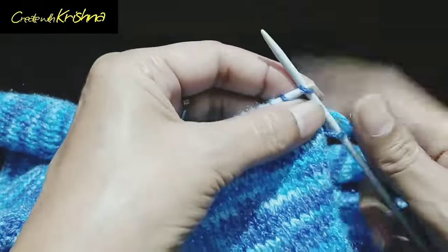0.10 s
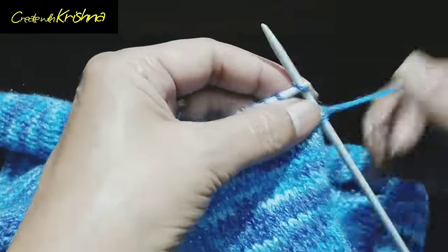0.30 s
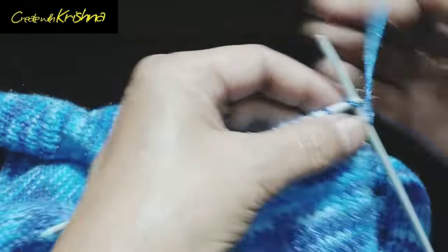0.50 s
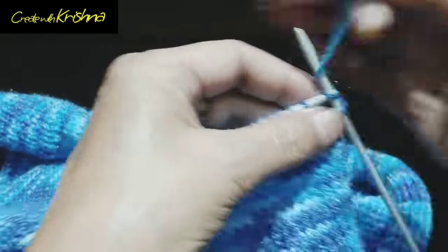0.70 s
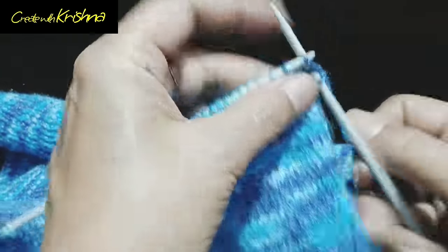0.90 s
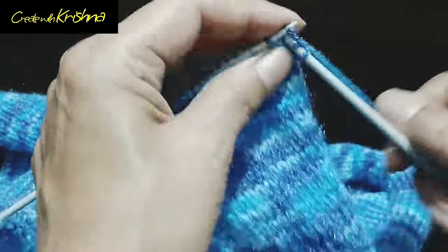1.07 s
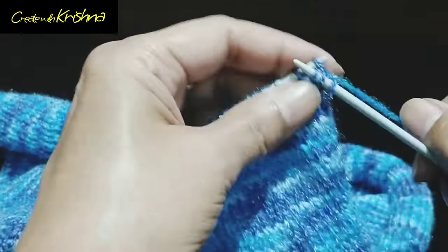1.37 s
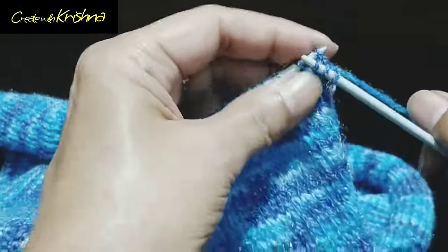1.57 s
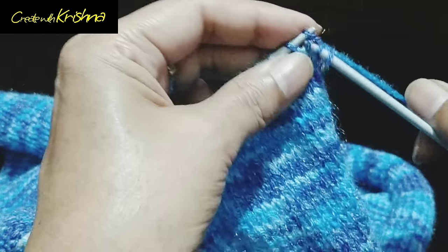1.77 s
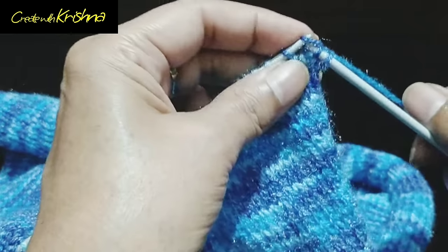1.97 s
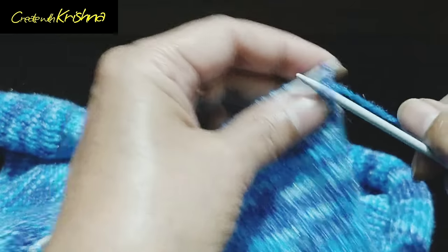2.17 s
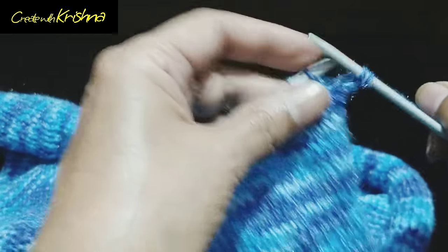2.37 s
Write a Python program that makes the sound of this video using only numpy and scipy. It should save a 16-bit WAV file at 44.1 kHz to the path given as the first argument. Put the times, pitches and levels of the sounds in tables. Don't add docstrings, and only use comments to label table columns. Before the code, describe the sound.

A metal knitting needle knocks sharply on a table, then faint clicks and yarn rustle over a hum

```python
import sys
import numpy as np
from scipy import signal
from scipy.fft import rfft, irfft, next_fast_len
from scipy.io import wavfile
from scipy.ndimage import map_coordinates

SR = 44100
rng = np.random.default_rng(int(sys.argv[2]) if len(sys.argv) > 2 else 0)


def digitize_waveform(pressure):
    field = np.atleast_2d(pressure).T
    bounded = np.clip(field, -1, 1)
    quanta = np.round(bounded * 32767).astype(np.int16)
    wavfile.write(sys.argv[1], SR, quanta)


def natural_amplitude(level_db):
    exponent = np.asarray(level_db, float) / 20
    return 10 ** exponent


N = 110250
TOP_HZ = 15550


def unit(x):
    return x / np.sqrt(np.mean(x ** 2) + 1e-20)


def along(points, hz):
    f, v = np.transpose(points)
    return np.interp(np.log(hz + 1), np.log(f + 1), v)


def wobble(rate):
    knots = rng.standard_normal(2000)
    return map_coordinates(knots, [np.arange(N) * min(rate, 700) / SR])


def filtered(x, response):
    m = next_fast_len(N + SR // 2)
    return irfft(rfft(x, m) * response(np.fft.rfftfreq(m, 1 / SR)), m)[..., :N]


def coloured(x, spectrum):
    return unit(filtered(x, lambda hz: natural_amplitude(along(spectrum, hz))))


def streaked(x):
    peaks = rng.standard_normal(400)
    return filtered(x, lambda hz: natural_amplitude(10 * map_coordinates(peaks, [hz / 60])))


STRUCK_HZ = [480, 810, 1620, 1950, 2850, 3634, 5475, 5879, 7200, 10330, 11050, 11890, 13540, 15200]
# left level/dB, right level/dB, hold/s, t60/s
STRUCK_RINGS = [(-37.5, -57, .008, .05), (-40.5, -45, 0.004, 0.023), (-25.5, -30.5, 0.0015, 0.023),
                (-32.5, -36.5, 0.0026, .025), (-28.5, -30.5, .003, 0.029), (-31, -45, .001, 0.038),
                (-38.5, -35.5, .012, 0.17), (-35.5, -33.5, .012, 0.18), (-29, -30.5, .001, 0.02),
                (-29.5, -37.5, .01, .06), (-14.5, -34, .001, .03), (-18.5, -45.5, 0.0054, .055),
                (-4.5, -35, .009, .035), (-38, -49.5, 0.014, .12)]
# f/Hz, left level/dB, right level/dB, hold/s, t60/s
STAND_RINGS = [(31, -41.5, -53, 0.026, 0.45), (56, -37, -45.5, 0.015, .15)]
# f/Hz, level/dB per Hz
CRACK_SPECTRUM = [(150, -6.5), (400, -13.5), (1600, 3.5), (4000, -0.5), (7000, 4.5), (9000, -1.5),
                  (12000, 2), (16000, -14.5)]
# f/Hz, level/dB per Hz
CLATTER_SPECTRUM = [(88, -29), (150, 5.5), (774, -24), (2650, -18.5), (4950, -18.5), (5680, -9),
                    (7400, -24), (13400, -13.5), (16000, -21.5)]


def knock():
    knock_s, rise_s, soft_s = .2258, 0.00048, 0.0024
    crack_t60, clatter_t60 = 0.025, 0.25
    right_lag_s = .000085
    t = np.maximum(np.arange(N) / SR - knock_s, 0)
    crack_db = -15.5 + np.array([[0], [-6]])
    crack = coloured(rng.standard_normal((2, N)), CRACK_SPECTRUM)
    out = natural_amplitude(crack_db - 60 * t / crack_t60) * crack
    clatter = coloured(streaked(rng.standard_normal((2, N))), CLATTER_SPECTRUM)
    out += natural_amplitude(-37 - 60 * t / clatter_t60) * clatter
    rings = [(hz, *row) for hz, row in zip(STRUCK_HZ, STRUCK_RINGS)]
    for hz, left_db, right_db, held, t60 in rings + STAND_RINGS:
        past = soft_s * np.logaddexp(0, (t - held) / soft_s)
        high = min(1, hz / 3000)
        flutter = np.array([wobble(110) + 1j * wobble(110) for port in "LR"])
        body = 1 + .28 * high * np.minimum(t / 0.018, 2) * flutter
        lag = 2j * np.pi * hz * right_lag_s * np.array([[0], [1]])
        body = body * np.exp(1j * high * rng.normal(0, 1) - lag)
        level = natural_amplitude([[left_db], [right_db]] - 60 * past / t60)
        out += level * (body * np.exp(2j * np.pi * hz * t)).imag
    return out * (1 - np.exp(-t / rise_s))


# t/s, f/Hz, left level/dB, right level/dB, t60/s
SLAPS = [(.2262, 8050, -20, -35, .012), (.2272, 6800, -30.5, -20.5, 0.011),
         (.2284, 5640, -21.5, -12.5, .016), (.2268, 1500, -28.5, -29, .02), (.2288, 15350, -22, -42.5, .02),
         (.228, 5787, -47.5, -44.5, .13), (.228, 6145, -50, -46.5, .1), (.228, 4570, -44, -44, 0.048),
         (.2265, 880, -35.5, -38.5, 0.033), (.2285, 15080, -23.5, -46, .06),
         (0.23, 16000, -28, -47.5, .012)]


def slaps():
    rise_s = 0.0008
    out = np.zeros((2, N))
    for s, hz, left_db, right_db, t60 in SLAPS:
        t = np.maximum(np.arange(N) / SR - s, 0)
        level = natural_amplitude([[left_db], [right_db]] - 60 * t / t60)
        out += level * (1 - np.exp(-(t / rise_s) ** 2)) * np.sin(2 * np.pi * hz * t)
    return out


def needle(x, hiss_db, modes):
    def response(f):
        ring = 0
        for k, (centre, width, db) in enumerate(modes):
            damping = 1j * f * width * 1.2
            ring = ring + (-1) ** k * natural_amplitude(db) * damping / (centre * centre - f * f + damping)
        dip = 1 - 0.8 * np.exp(-((f - 9000) / 1100) ** 2)
        no_bass = (1j * f / (900 + 1j * f)) ** 2
        return (ring + natural_amplitude(hiss_db - 7.5)) * dip * no_bass
    return filtered(x, response)


# f/Hz, width/Hz, level/dB, loudest t/s
DRAG_RINGS = [(1360, 70, -6, 0.744), (1640, 60, -4.5, 0.818), (2494, 45, -0.5, .87), (2879, 110, -1, 0.684),
              (3380, 95, -11.5, 0.81), (4360, 100, -17.5, .7), (5450, 50, -3, 0.836), (6130, 80, -7, 0.81),
              (6340, 50, -9, 0.79), (7180, 100, -9.5, .65), (7620, 60, -4.5, 0.84), (11900, 59, -0.5, 0.85),
              (13500, 55, -0.5, .84), (15200, 70, -2, .83)]
# t/s, level/dB
DRAG_PRESSURE = [(0.6, -72), (0.674, -63.5), (0.784, -64.5), (0.848, -59.5), (0.879, -63), (0.896, -78),
                 (0.93, -76)]
# t/s, peak level/dB, rattle t60/s
BOUNCES = [
    (0.5202, -40, 0.11),
    (0.5344, -38, 0.16),
]
# f/Hz, width/Hz, level/dB
LOOSE_RINGS = [(1270, 115, -2.5), (2980, 310, 1), (4540, 200, -15), (6170, 215, 0.5), (7550, 200, 0.5),
               (10600, 500, -6.5), (11800, 180, -4.5), (13500, 300, -1.5), (15000, 360, -10.5)]


def drag():
    favour_db, favour_s = 5.5, 0.034
    tap_t60, rattle_db, tap_snap = .012, -9, 3
    press_s, press_db = np.transpose(DRAG_PRESSURE)
    t = np.arange(N) / SR
    grit = natural_amplitude(wobble(120)) * rng.standard_normal(N)
    scrape = needle(grit, -10.5, [])
    for *mode, loudest in DRAG_RINGS:
        favour = natural_amplitude(favour_db * np.exp(-((t - loudest) / favour_s) ** 2))
        scrape += needle(favour * grit, -60, [mode])
    out = natural_amplitude(2.5 + np.interp(t, press_s, press_db, left=-120, right=-120)) * unit(scrape)
    for s, db, t60 in BOUNCES:
        fall_db = -60 * np.abs(t - s)
        shake = (t > s) * (natural_amplitude(fall_db / tap_t60) + natural_amplitude(rattle_db + fall_db / t60))
        shake *= rng.standard_normal(N)
        shake[round(s * SR)] += tap_snap
        tap = needle(shake, -4.5, LOOSE_RINGS)
        out += natural_amplitude(db) * tap / np.abs(tap).max()
    return out


# t/s, peak level/dB, t60/s, dullness/dB per octave, ring f/Hz
CLICKS = [
    (1.8853, -32.5, 0.012, 3, 5850),
    (2.2785, -26, 0.0085, -4, 10300),
    (2.333, -43, .012, -4, 15000),
    (2.4625, -46.5, 0.013, 10, 4800),
    (2.463, -50, .013, 26, 2600),
    (1.152, -58.5, 0.014, 3, 13500),
]
# f/Hz, level/dB per Hz
TIP_SPECTRUM = [(1180, -66), (2000, -32), (4000, -29), (6500, -19), (8930, -26), (10600, -15), (13800, 1),
                (15600, -4), (16600, -23.5)]


def clicks():
    rise_s, snap = .0003, 7
    ring_db, ring_width = 9, .09
    out = np.zeros(N)
    for s, db, t60, dull_db, ring_hz in CLICKS:
        top_hz = 16700 if db > -43 else TOP_HZ
        t = np.arange(N) / SR - s
        swell = np.where(t > 0, natural_amplitude(-60 * np.abs(t) / t60), np.exp(-np.abs(t) / rise_s))
        burst = swell * rng.standard_normal(N)
        burst[round(s * SR)] += snap
        burst = filtered(burst, lambda hz: natural_amplitude(ring_db * np.exp(-((hz / ring_hz - 1) / ring_width) ** 2)))
        tilted = [(hz, level - dull_db * np.log2(max(hz, 4500) / 6000)) for hz, level in TIP_SPECTRUM]
        burst = coloured(burst, tilted)
        burst = filtered(burst, lambda hz: 1 / (1 + (hz / top_hz) ** 100))
        out += natural_amplitude(db) * burst / np.abs(burst).max()
    return out


# middle t/s, length/s, level/dB, dull rub level/dB, brightest f/Hz
RUSTLES = [(0.414, 0.16, -70, -11, 13500), (0.562, 0.06, -68, -11, 13800), (.855, 0.055, -62.5, -20, 13500),
           (0.616, 0.031, -67.5, -17, 13500), (0.933, 0.11, -68, -14, 13500),
           (1.047, 0.076, -63.5, -15, 13200), (1.294, 0.043, -54.5, -22.5, 12550),
           (1.253, .03, -66.5, -16, 13000), (1.359, 0.087, -77, -2.5, 13100),
           (1.767, 0.047, -69, -16.5, 13500), (2, 0.021, -77, -17, 13500), (2.193, .1, -76, -11, 13500),
           (2.292, 0.031, -60, -20, 14200), (2.325, 0.031, -59.5, -23, 14000),
           (2.355, 0.073, -84, 6, 13000), (2.468, 0.045, -76, -9, 14500)]
# f/Hz, level/dB per Hz
YARN_SPECTRUM = [(4120, -38), (7000, -21), (9100, -29), (11050, -7.5), (11700, -15), (12800, -3),
                 (14000, -6.5), (15100, -5.5), (16000, -9.5)]
# f/Hz, level/dB per Hz
RUB_SPECTRUM = [(1200, -14), (2500, 2), (4500, 1.5), (6000, 7), (8500, -38)]


def yarn():
    bright_db, bright_width_hz = 3, 670
    t = np.arange(N) / SR
    fine = coloured(natural_amplitude(2 * wobble(160)) * rng.standard_normal(N), YARN_SPECTRUM)
    rub = coloured(natural_amplitude(2 * wobble(160)) * rng.standard_normal(N), RUB_SPECTRUM)
    out = np.zeros(N)
    for s, length, db, rub_db, hz in RUSTLES:
        bright = unit(filtered(fine, lambda f: natural_amplitude(bright_db * np.exp(-((f - hz) / bright_width_hz) ** 2))))
        swell = np.exp(-np.abs(2 * (t - s) / length) ** 3)
        out += natural_amplitude(db) * swell * (bright + natural_amplitude(rub_db) * rub)
    return 1.77 * out


# f/Hz, left over right level/dB
PORT_SHADE = [(1000, -2), (5000, 5), (9000, 15), (13000, 28), (16000, 14.5)]


def ports(x):
    return filtered(x, lambda hz: natural_amplitude(along(PORT_SHADE, hz) * np.array([[0], [-1]])))


# f/Hz, t60/s
ROOM_T60 = [(200, 0.23), (2000, 0.27), (6000, 0.43), (15000, 0.15)]


def room(x):
    hz, t, z = signal.stft(rng.standard_normal((2, SR // 2)), SR, nperseg=256)
    fade = natural_amplitude(-60 * t / along(ROOM_T60, hz)[:, None])
    tail = signal.istft(z * fade, SR, nperseg=256)[1]
    late = np.pad(x, (200, 0))[None]
    return signal.fftconvolve(late, tail / np.linalg.norm(tail[0]), axes=1)[:, :N]


# f/Hz, likeness (-1 to 1)
ALIKE = [(60, 0.73), (180, 0.83), (550, 0.78), (1650, -0.24), (4970, 0.0), (15000, -0.29)]


def rush(spectrum, low_hz, top_hz):
    def gain(hz):
        turn = np.arccos(np.clip(along(ALIKE, hz), -1, 1)) / 2
        band = (hz > low_hz) * (hz < top_hz)
        return natural_amplitude(along(spectrum, hz)) * band * [np.cos(turn), np.sin(turn)]
    mid, side = filtered(rng.standard_normal((2, N)), gain)
    return unit(np.array([mid + side, mid - side]))


# f/Hz, rms level/dB, unsteadiness/dB, swings per s
HUM = [(52.4, -74.5, 5, 3.9), (145.3, -63.5, 2.5, 3.7), (241, -68, 3, 12), (267.9, -70, 2, 16),
       (359.7, -81, 4, 14), (483, -75, 3.5, 14), (601.8, -70, 1, 12), (716.7, -77.5, 2.5, 14)]
# t/s, rms level/dB
BEAT = [(0.0, -78), (0.12, -58), (0.63, -63.5), (0.76, -77), (0.83, -62.5), (1.02, -80), (1.06, -62),
        (1.25, -60.5), (1.37, -71), (1.51, -58), (1.72, -72), (2.0, -61.5), (2.46, -65), (2.5, -68.5)]
# f/Hz, level/dB per Hz
AIR_SPECTRUM = [(12, -35.5), (20, 1.5), (143, -11), (191, -6.5), (255, -5.5), (341, -8), (597, -9),
                (665, -18.5), (1500, -25), (1950, -61), (3300, -120)]
# f/Hz, level/dB per Hz
HISS_SPECTRUM = [(530, -31), (900, 0.5), (1620, -9), (2250, -8.5), (2960, -10.5), (3190, -10), (9880, -19),
                 (14500, -8.5), (16000, -19.5)]


def fan():
    beat_hz, edge_hz = 99.5, 1100
    t, out = np.arange(N) / SR, np.zeros((2, N))
    for hz, db, swing_db, rate in HUM:
        phase = 2 * np.pi * hz * t + 0.37 * swing_db * wobble(rate)
        apart = .45 * hz / 200 * (1 + np.array([wobble(rate), -wobble(rate)]))
        level = natural_amplitude(db + swing_db * wobble(rate) + [[.8], [-.8]])
        out += np.sqrt(2) * level * np.sin(phase + apart)
    beat_phase = 2 * np.pi * beat_hz * t + .5 * wobble(5) + [[.2], [-.2]]
    out += 1.4 * natural_amplitude(np.interp(t, *np.transpose(BEAT))) * np.sin(beat_phase)
    out += natural_amplitude(-62 + 0.33 * wobble(6)) * rush(AIR_SPECTRUM, 15, edge_hz)
    return out + natural_amplitude(-70) * rush(HISS_SPECTRUM, edge_hz, TOP_HZ + 50)


# f/Hz, level/dB
ROOM_SHADE = [(1000, 1), (7000, 1.5), (13000, -10)]


def scene():
    near = knock() + ports(drag() + yarn())
    firm = slaps()
    wet = room((near + firm).mean(0))
    wet = filtered(wet, lambda hz: natural_amplitude(along(ROOM_SHADE, hz) * np.array([[0], [1]])))
    soft = filtered(near + natural_amplitude(-19) * wet, lambda hz: 1 / (1 + (hz / TOP_HZ) ** 200))
    return soft + firm + ports(clicks()) + fan()


def band_limit(x):
    return signal.sosfilt(signal.butter(12, 16800, fs=SR, output="sos"), x)


def record(dry):
    return band_limit(dry)


dry = scene()
out = record(dry)
digitize_waveform(out)
```